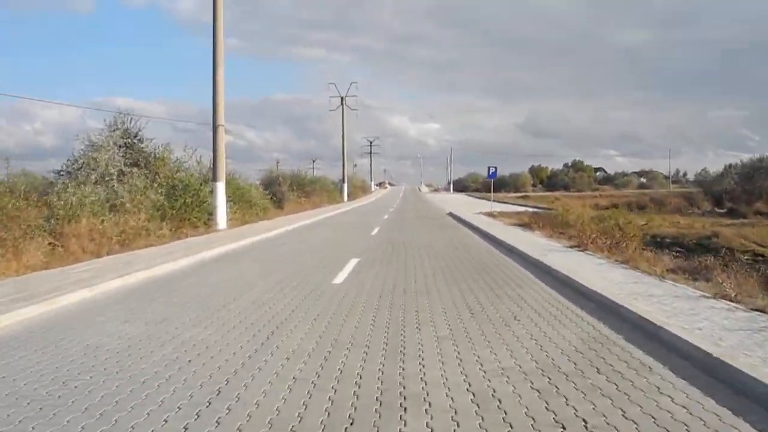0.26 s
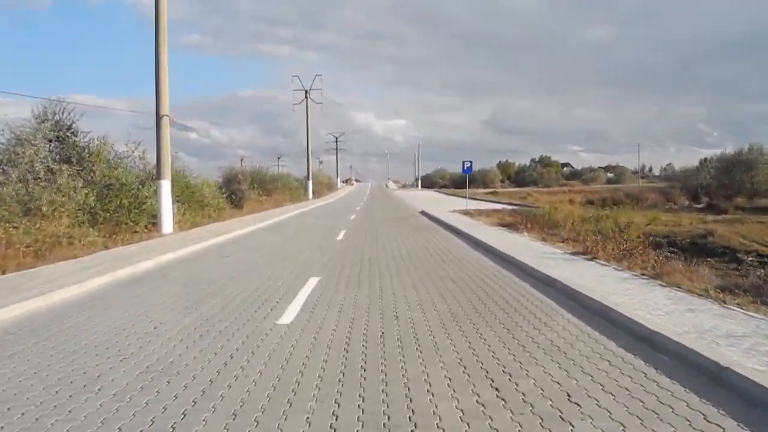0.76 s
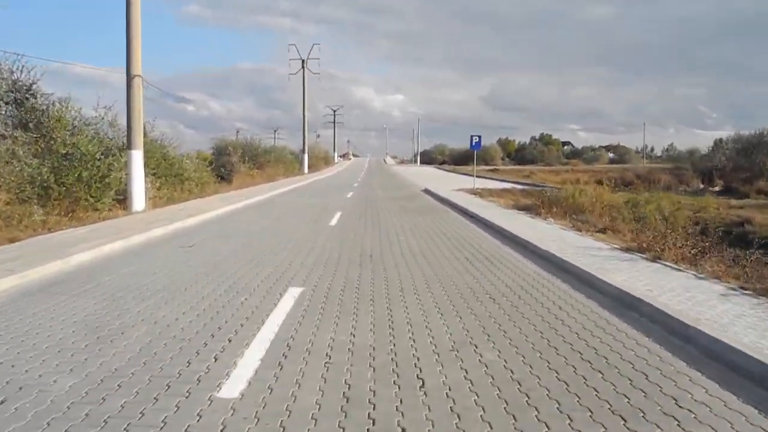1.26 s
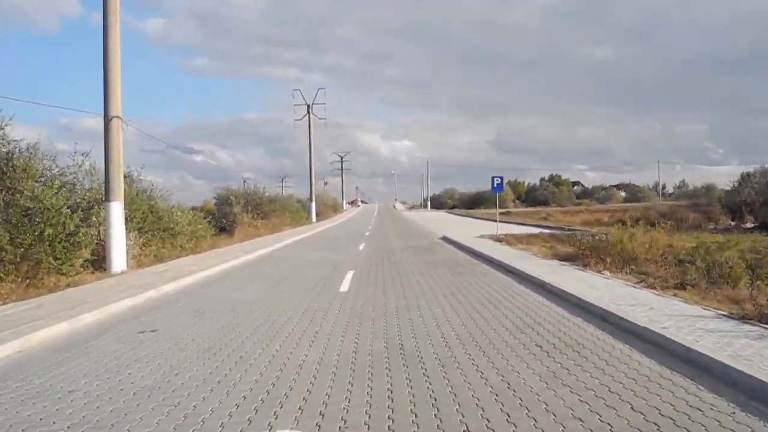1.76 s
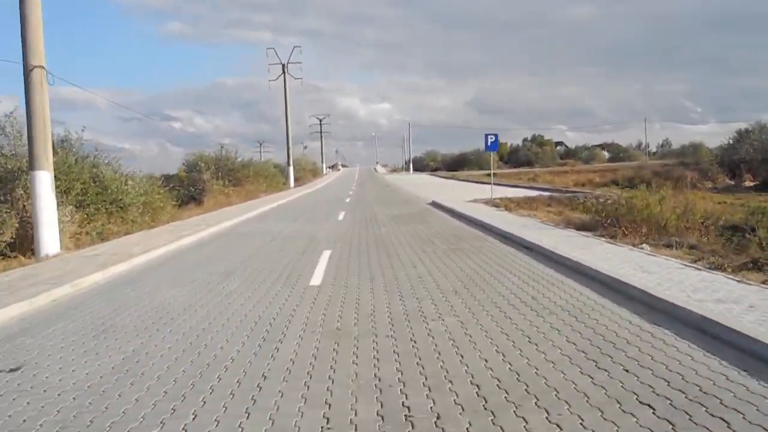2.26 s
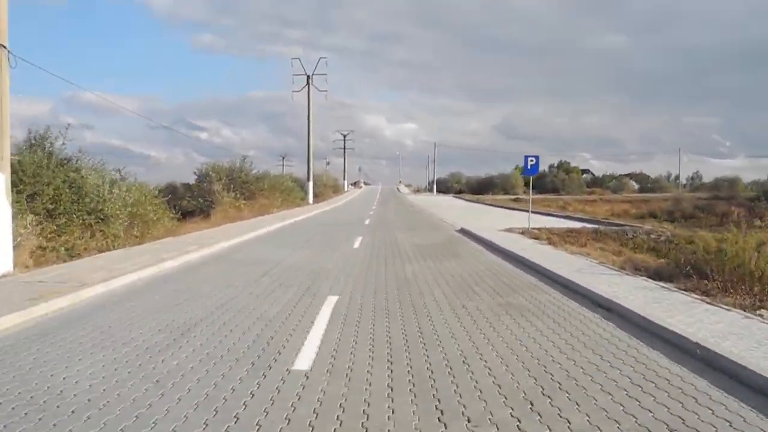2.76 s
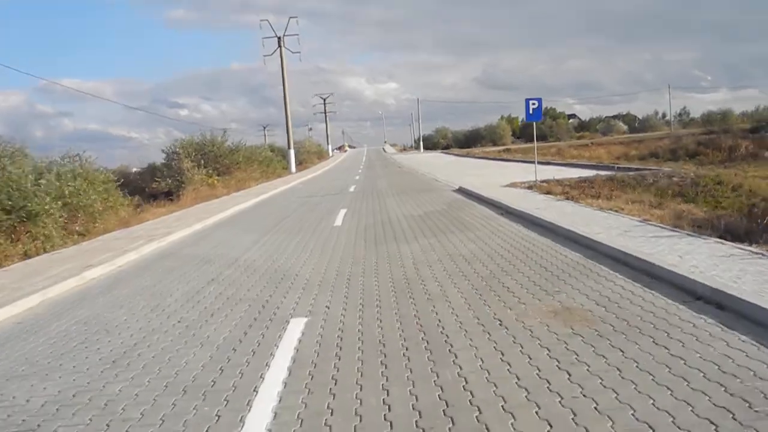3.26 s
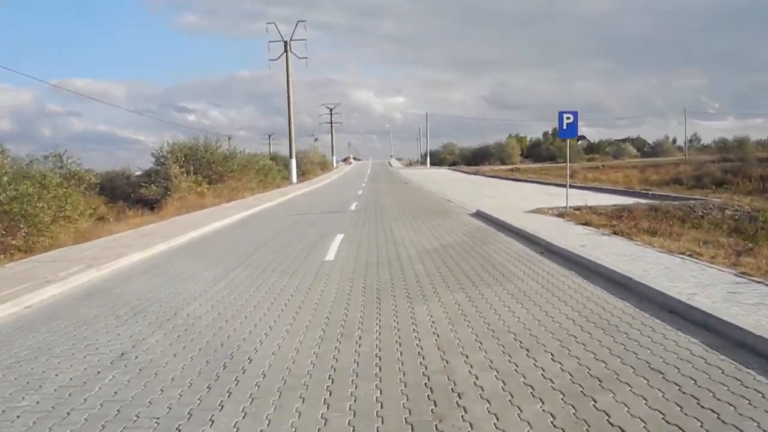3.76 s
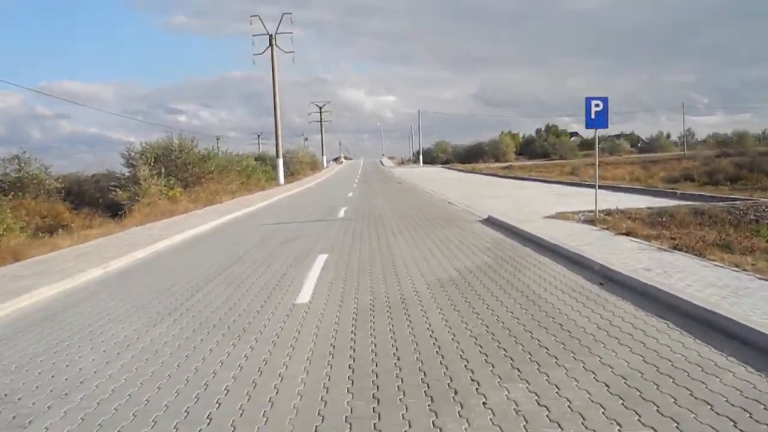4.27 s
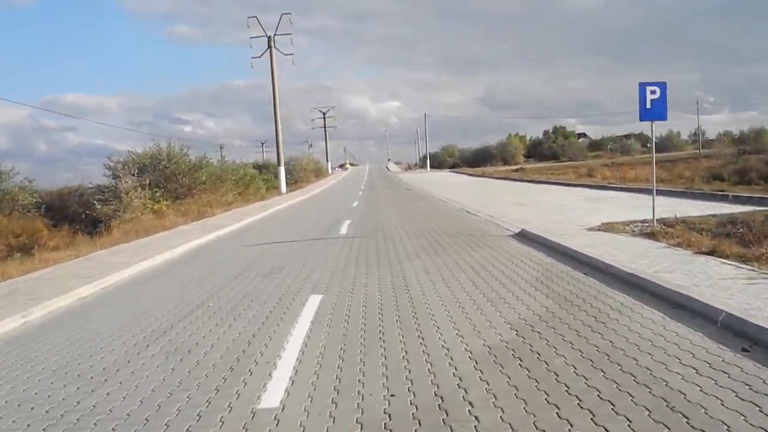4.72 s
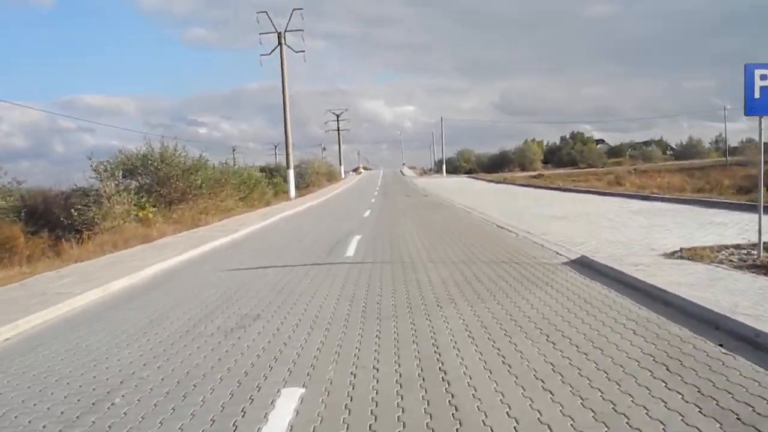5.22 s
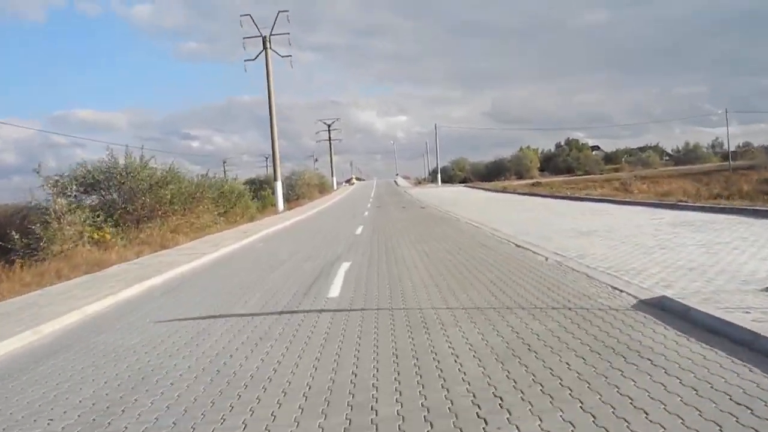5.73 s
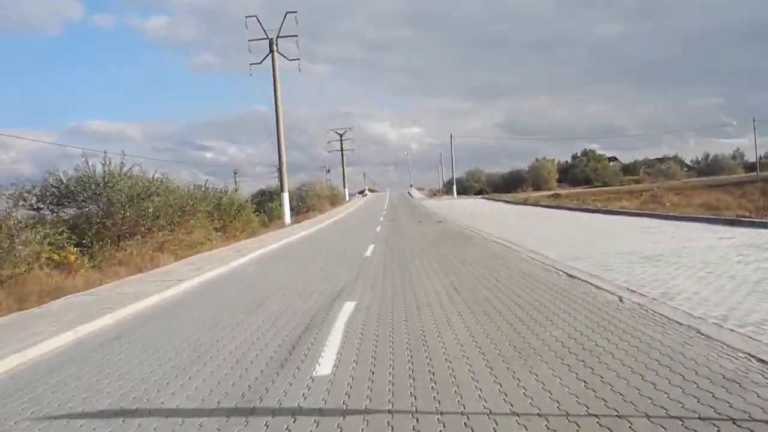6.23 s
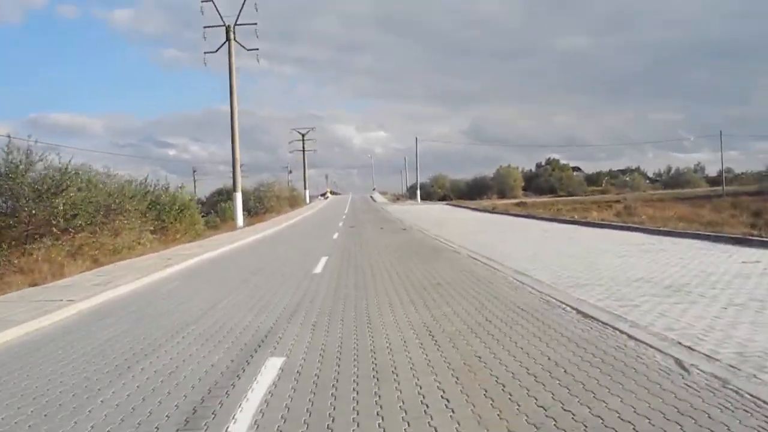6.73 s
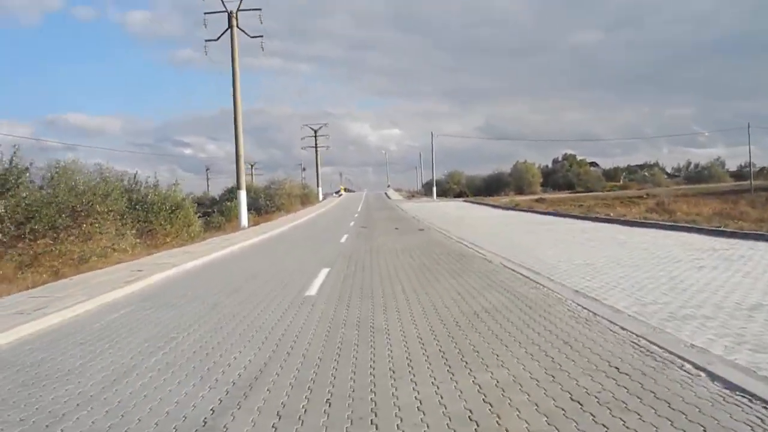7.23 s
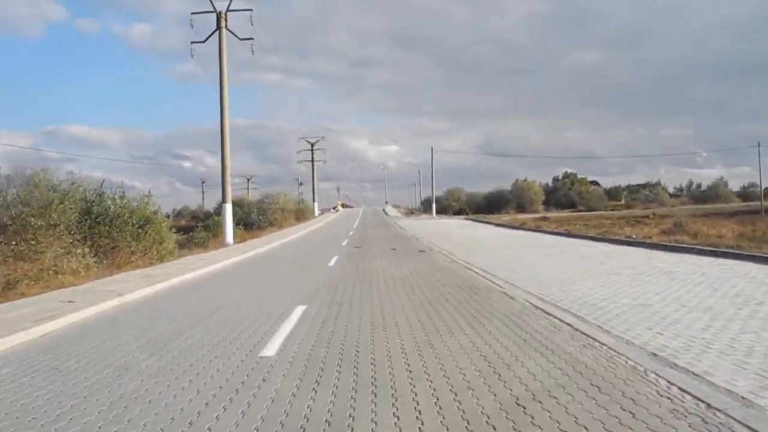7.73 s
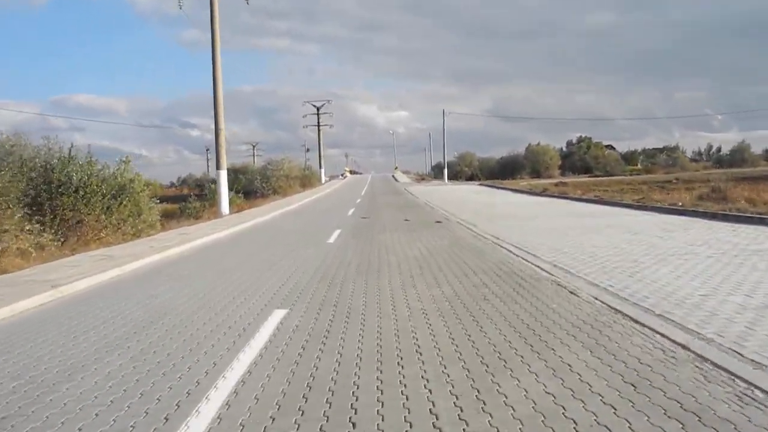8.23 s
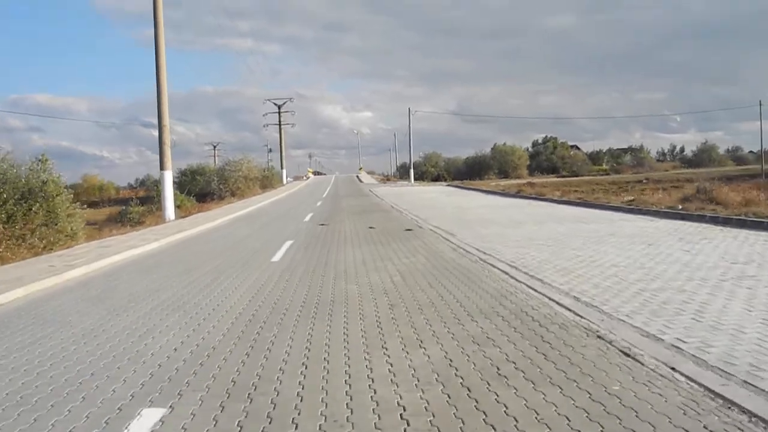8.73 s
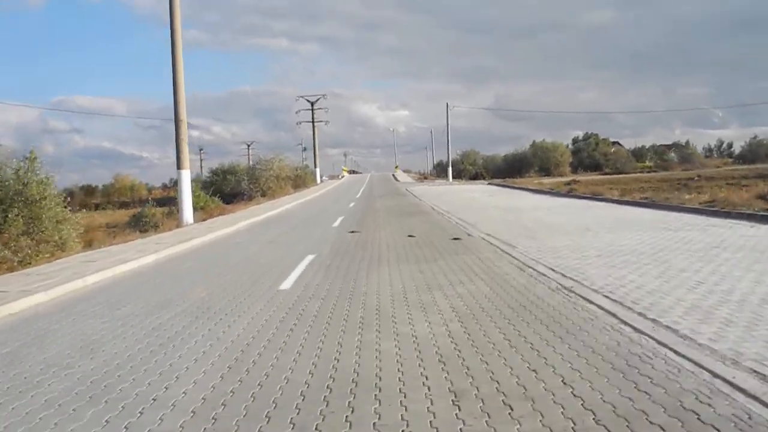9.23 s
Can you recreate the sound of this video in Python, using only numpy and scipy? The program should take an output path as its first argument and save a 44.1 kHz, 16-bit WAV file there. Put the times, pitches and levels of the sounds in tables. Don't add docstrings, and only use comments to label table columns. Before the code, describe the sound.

Headwind rumbles and drums against the microphone of a moving bicycle while tyres roar over paving joints and loose parts tick and rattle.

```python
import sys
import numpy as np
from scipy import signal
from scipy.fft import rfft, irfft, next_fast_len
from scipy.io import wavfile
from scipy.ndimage import uniform_filter1d

SR = 44100
rng = np.random.default_rng(int(sys.argv[2]) if len(sys.argv) > 2 else 0)


def natural_amplitude(level_db):
    exponent = np.asarray(level_db, float) / 20
    return 10 ** exponent


def unload_audio(sound):
    columns = np.transpose(np.atleast_2d(sound))
    steps = np.round(np.clip(columns, -1, 1) * 32767)
    wavfile.write(sys.argv[1], SR, steps.astype(np.int16))


N = 418509
STRIKE_S = np.arange(-900, 900) / SR


def unit(x):
    return x / np.sqrt(np.mean(x ** 2))


def colour(x, shape):
    size = next_fast_len(x.shape[-1])
    hz, db = np.transpose(shape)
    f = np.maximum(np.arange(size // 2 + 1) * SR / size, 1)
    gain = natural_amplitude(np.interp(np.log(f), np.log(hz), db, left=-99, right=-99))
    return unit(irfft(rfft(x, size) * gain, size)[..., :x.shape[-1]])


def walk(rate_hz):
    k = int(SR / rate_hz)
    steps = np.repeat(rng.standard_normal(N // k + 1), k)
    return unit(uniform_filter1d(uniform_filter1d(steps, k), k)[:N])


def curves(table):
    s, *columns = np.transpose(table)
    return [np.interp(np.arange(N) / SR, s, c) for c in columns]


def bumps(rows):
    s, height, half = np.transpose(rows)[:, :, None]
    t = np.arange(0, N + 256, 256) / SR
    change_db = (height * np.maximum(1 - abs(t - s) / abs(half), 0)).sum(axis=0)
    return np.interp(np.arange(N) / SR, t, change_db)


def patchy(shape, shared_db, own_db, rate_hz, count):
    size = next_fast_len(N)
    whole = rfft(colour(rng.standard_normal(size), shape))
    edges = np.log(np.array([shape[1][0], shape[-2][0]]) * size / SR)
    place = np.interp(np.log(np.arange(len(whole)) + 1), edges, [0, count - 1])
    total = 0
    for k in range(count):
        band = irfft(whole * np.maximum(1 - abs(place - k), 0), size)[:N]
        total = total + band * natural_amplitude(own_db * walk(rate_hz))
    return unit(natural_amplitude(shared_db) * total)


def add(track, s, grain):
    i = max(int(s * SR), 0)
    grain = grain[..., i - int(s * SR):]
    track[..., i:i + grain.shape[-1]] += grain[..., :N - i]


def burst(shape, length_s, lean=.65, edge=0.93):
    x = np.linspace(0, 1, int(np.clip(length_s, .004, .09) * SR))
    noise = colour(rng.standard_normal(4096), shape)[:len(x)]
    return unit(noise * abs(np.sin(np.pi * x ** lean)) ** edge)


def strike(db, pan_db, shape, fade_s, sharp=0):
    t = STRIKE_S
    source = rng.standard_normal((2, len(t)))
    source[1] = source[0] * natural_amplitude(-abs(pan_db)) + source[1] * np.sqrt(1 - natural_amplitude(-2 * abs(pan_db)))
    noise = colour(source, shape)
    crack = colour(1. * (t == 0), shape)
    click = (noise * (t > 0) + sharp * crack) * np.exp(-abs(t) / fade_s)
    click = click / abs(click).max(axis=1, keepdims=True)
    click = click + natural_amplitude(-26.0) * noise * np.hanning(len(t))
    return natural_amplitude(db + np.array([[pan_db], [-pan_db]]) / 2) * click


def flutter(hz):
    return [(290, -9), (.85 * hz + 40, -3), (hz + 45, 0), (1.3 * hz + 90, -9), (2.2 * hz, -19), (4 * hz, -35)]


# frequency in Hz, level in dB per Hz.
TYRE_ROAR = [(530, -4), (900, 2.5), (1080, -4), (1290, 4), (1450, -3), (1760, -3), (1980, -10),
             (3300, -22.5), (4290, -59), (7260, -120)]
# time in seconds, change in dB, half length in seconds.
ROAR_CHANGES = [
    (1.14, 2.5, 0.11),
    (2.7, -8, 0.035),
    (3.83, -2, 0.032),
    (5.0, 2, .07),
    (6.19, -5, 0.068),
    (6.61, 7, 0.11),
    (7.38, 6, 0.028),
    (7.66, 8, 0.044),
    (8.0, -4.5, 0.14),
]


def tyres(wind_db, eddy):
    roar = patchy(TYRE_ROAR, 0.88 * eddy + 2.1 * walk(90), own_db=1.5, rate_hz=18, count=5)
    return natural_amplitude(-54.5 + wind_db + bumps(ROAR_CHANGES)) * roar


# start in seconds, peak in dB, ring in Hz.
MORE_KNOCKS = [(0.7485, -46, 1700), (1.1224, -48, 1500), (1.714, -41, 1710), (2.291, -47, 1980),
               (3.7663, -37, 1680), (3.9138, -41, 1640), (5.151, -43.5, 1550), (5.307, -44, 1530),
               (5.546, -37, 1630), (6.047, -47, 1590), (6.1235, -51, 1500), (6.4676, -47, 1890),
               (6.582, -48, 1850), (6.661, -44, 2280), (6.695, -41, 1720), (6.7703, -37, 1740),
               (8.0387, -50.5, 1720), (8.85, -34, 1510), (9.237, -45, 1550), (9.339, -40, 1670)]


def more_knocks():
    out = np.zeros((2, N))
    for s, db, hz in MORE_KNOCKS:
        add(out, s, natural_amplitude(db - 8) * burst([(0.35 * hz, -15), (hz, 0), (1.4 * hz, -12)], 0.009))
    return out


# start in seconds, peak in dB, ring in Hz, length in seconds.
KNOCKS = [(1.257, -42, 1840, 0.015), (1.316, -39, 1560, 0.012), (2.207, -34.5, 1670, 0.0089),
          (2.635, -40, 1710, 0.014), (3.564, -44, 2350, 0.037), (5.515, -38, 1560, 0.0031),
          (5.82, -49, 1880, 0.012), (6.637, -48.5, 2120, 0.026), (7.284, -37, 1860, 0.0035),
          (7.59, -37, 1740, 0.0048), (7.838, -48, 1710, 0.01)]


def knocks():
    out = np.zeros((2, N))
    for s, db, hz, length_s in KNOCKS:
        add(out, s - .002, natural_amplitude(db - 5.5) * burst([(0.52 * hz, -15), (hz, 0), (1.36 * hz, -12)], length_s))
    return out


# frequency in Hz, level in dB per Hz.
TREBLE = [(1760, -23), (3000, 1), (3290, -2), (5630, -4.5), (6480, -3), (8640, -11.5), (12600, -10.5),
          (15100, -16), (16000, -9)]
# time in seconds, change in dB, half length in seconds.
HUSHES = [(.05, -4, 0.097), (.19, -7, 0.093), (.46, -5, 0.03), (.85, -5, .05), (2.02, -3, 0.056),
          (4.24, -9, .06), (4.34, -7.5, .05), (4.71, -8.5, 0.062), (4.82, 3.5, 0.064), (5.24, -3.5, 0.043),
          (5.89, 5, 0.072), (6.4, -3, .05), (6.89, -3.5, 0.056), (7.21, -5, 0.036), (2.4, -2, 0.045),
          (8.49, -2.5, 0.18), (8.73, -5, 0.042)]


def chatter(wind_db, bright_db, lean_db):
    bright_db = bright_db + bumps(HUSHES)
    left_db = -67.5 + 0.75 * wind_db + bright_db + lean_db / 2
    right_db = -71.5 + 0.95 * wind_db + bright_db - lean_db / 2
    out = []
    for db in (left_db, right_db):
        shake_db = 2.5 * walk(25)
        grit = 0
        for hz, spread in ((4450, 1.08), (6100, 1.2), (6500, 2.1)):
            chance = rng.random((2, N))
            hits = chance[0] < 55 / SR * natural_amplitude(.25 * (db + 66))
            clicks = hits * natural_amplitude(-2.3 * np.log(chance[1] + .12))
            tail = rng.standard_normal(N) * signal.lfilter([1], [1, -.93], clicks)
            ring = [(.45 * hz, -20), (hz / spread, -11), (hz, 0), (hz * spread, -12), (16000, -23)]
            grit = grit + colour(tail, ring)
        hiss = patchy(TREBLE, shake_db, own_db=.8, rate_hz=16, count=4)
        out.append((natural_amplitude(db) + natural_amplitude(-90.0)) * (natural_amplitude(-1.5) * hiss + natural_amplitude(-3.5) * unit(grit)))
    return np.array(out)


# frequency in Hz, level in dB per Hz.
CRACK = [(300, 24.5), (1500, -0.5), (3300, 0), (8000, -2), (16000, -11)]
# start in seconds, peak in dB, left minus right in dB, ring in Hz.
RATTLES = [(0.9226, -47, 3, 4830), (1.197, -52, -12, 4200), (1.256, -42, -7, 3820), (1.266, -49, -4, 3570),
           (1.3171, -32.5, -4.5, 6550), (1.3518, -51, -16, 6200), (1.5979, -41, 3, 4640),
           (1.61, -49, -14, 4600), (1.8353, -51, -12, 4350), (1.8453, -47, -4, 5730),
           (1.9365, -48.5, 1, 5600), (2.1466, -43.5, 3, 4570), (2.249, -47, -7, 3940),
           (2.6475, -39, -6, 5950), (2.7952, -45, -4.5, 5170), (2.8284, -48, -3, 6370),
           (3.0038, -52, 9, 4220), (3.0723, -48, 11, 5300), (3.1511, -52, 7, 6240), (3.157, -49, 18, 4260),
           (3.2371, -47, 14, 4350), (3.2784, -54.5, 17.5, 4400), (3.371, -52.5, 14, 4700),
           (3.3922, -48, -4, 5730), (3.7912, -45, -2, 4700), (4.0058, -47, 7, 4230),
           (4.1713, -54, 18, 4280), (4.561, -57, 17, 7840), (4.8963, -54, -14, 4190),
           (5.1643, -52, 23, 5300), (5.815, -41, 5, 4440), (5.8966, -50, 3, 4900), (6.4683, -44, 1, 4550),
           (6.5827, -44, 6, 4500), (6.6384, -48.5, -4, 4610), (6.6453, -52, 15, 6420),
           (6.7121, -45.5, 4, 5360), (6.7716, -50, -2, 6370), (6.8307, -47, -14, 4340),
           (6.9754, -54, -19, 6200), (7.3697, -53, -16, 6740), (7.944, -48, -2, 6200),
           (8.042, -46, -9, 4100), (8.1423, -48, 3, 6200), (8.1522, -51.5, -11, 5250),
           (9.1683, -46, -1, 5250), (9.217, -48, 6, 8790)]


def rattles():
    out = np.zeros((2, N))
    for s, db, pan_db, hz in RATTLES:
        shape = [(0.85 * hz, -20), (hz, 0), (1.2 * hz, -20)]
        ring = strike(db - 2 - 0.25 * abs(pan_db), pan_db, shape, 0.0013)
        crack = strike(db + 1 + 0.18 * abs(pan_db), pan_db, CRACK[1:], 0.00028)
        add(out, s + STRIKE_S[0], ring + crack)
    return out


# start in seconds, peak in dB, left minus right in dB.
HAIRS = [(0.1496, -50, 19), (0.4456, -52, 20), (1.122, -47, -3), (1.4301, -54, -2.0), (6.7564, -41, -1.0),
         (8.7789, -58, 2), (8.9376, -63, 1.0), (9.109, -45, 7), (0.7922, -46, 2), (0.9618, -52, -1),
         (1.0576, -50, 3), (2.5612, -40, -2), (2.6091, -50, 1), (2.7213, -45, 0), (6.089, -52, -2),
         (9.144, -47, 6), (9.456, -49, 14)]


def hairs():
    out = np.zeros((2, N))
    for s, db, pan_db in HAIRS:
        add(out, s + STRIKE_S[0], strike(db + 0.5, pan_db, CRACK[1:], 0.0003, sharp=.15))
    return out


# start in seconds, peak in dB, ring in Hz.
JINGLES = [(2.673, -45, 5900), (2.639, -42, 6450), (3.2156, -49, 4580), (3.247, -54, 4380),
           (3.2674, -49, 4680), (3.4443, -46, 4500), (3.578, -47, 4430), (3.6885, -46, 4500),
           (3.7944, -51, 4700), (8.4233, -50.5, 6060), (8.6705, -42.5, 5500), (8.8333, -47, 5700),
           (8.88, -48, 5160), (9.0448, -39.5, 4250), (9.176, -43, 6100), (9.2668, -51, 6030)]


def jingles():
    out = np.zeros((2, N))
    for s, db, hz in JINGLES:
        shape = [(0.7 * hz, -25), (hz, 0), (1.16 * hz, -13), (1.8 * hz, -22)]
        add(out, s + STRIKE_S[0], strike(db - 0.5, 0, shape, 0.0036))
    return out


# start in seconds, peak in dB, left minus right in dB.
SNAPS = [(1.585, -33, -11.5), (3.446, -36.5, 5.5), (4.0165, -41, 9), (5.65, -44.5, -11), (5.8228, -43, 4),
         (7.2783, -39, 6), (8.343, -51, -13), (1.354, -52, -8), (1.802, -50, -20), (5.942, -45, -4),
         (6.369, -51, -17), (6.9059, -59, -16), (7.0785, -54.5, -19)]


def snaps():
    out = np.zeros((2, N))
    for s, db, pan_db in SNAPS:
        add(out, s + STRIKE_S[0], strike(db + 10.5, pan_db, CRACK, 0.0001))
    return out


# start in seconds, peak in dB, left minus right in dB, ring in Hz.
TICKS = [(0.062, -47, 22, 4440), (0.2814, -47.5, -22, 4320), (0.5117, -47.5, 9, 4160),
         (0.717, -39.5, 4, 6270), (1.2034, -45, 1, 5760), (1.311, -34, 9, 5370), (1.329, -36, -23, 4600),
         (1.3897, -43, 1, 4460), (1.4553, -40.5, -2, 6280), (1.679, -40.5, 4, 6060),
         (1.7244, -44, -11, 4100), (2.072, -40, 0, 6100), (2.6745, -33, 1, 4150), (2.772, -37, 0, 5770),
         (3.0522, -36.5, -5, 5560), (3.3978, -39.5, -1, 6110), (3.763, -34, 6, 4370), (4.025, -42, 3, 6300),
         (4.207, -46, 24, 4220), (5.562, -45, -26, 4970), (6.344, -54, -27, 4420), (6.66, -37, -7, 4230),
         (6.745, -42, -18, 5600), (6.8, -49, -12, 4300), (7.408, -48, -27.5, 4350),
         (7.589, -34, -3.5, 3530), (8.0153, -38.5, -1.5, 6000), (8.124, -34, 0, 4200),
         (8.212, -44.5, -3, 4180), (8.7205, -42, 14, 4560)]


def ticks():
    out = np.zeros((2, N))
    for s, db, pan_db, hz in TICKS:
        ring = strike(db - 5.0, pan_db, [(0.9 * hz, -20), (hz, 0), (1.1 * hz, -20)], 0.00096)
        add(out, s + STRIKE_S[0], ring + strike(db - 2.5, pan_db, TREBLE, 0.001))
    return out


# start in seconds, peak in dB.
LEFT_CRACKS = [(0.0057, -39.5), (0.26, -45), (0.33, -40), (1.9747, -42.5), (1.9975, -42), (3.203, -47),
               (3.247, -40), (3.3466, -38.5), (3.6005, -32.5), (3.7994, -39), (3.9252, -36), (4.0618, -42),
               (4.095, -43), (4.186, -39), (4.4011, -36), (4.4233, -46), (4.4667, -35), (4.601, -39),
               (5.0844, -40), (5.174, -34), (5.2115, -43.5), (6.069, -44), (7.0284, -41), (9.3706, -37.5),
               (9.4118, -39), (9.4284, -38)]
# start in seconds, peak in dB.
RIGHT_CRACKS = [(0.7238, -35), (0.8945, -46), (0.978, -38), (1.138, -46), (1.256, -55), (1.8303, -36),
                (2.2513, -33.5), (2.2703, -41), (2.295, -35), (2.378, -41), (2.813, -36.5), (4.86, -40.5),
                (4.888, -34), (4.9328, -36), (5.51, -40), (6.1253, -33), (6.1593, -32.5), (6.1815, -40),
                (6.3232, -39.5), (6.477, -39), (6.5642, -36), (6.833, -51), (6.9623, -41), (7.0068, -39.5),
                (7.6814, -33), (7.8336, -32.5), (7.853, -37), (8.17, -40), (8.3033, -43.5), (8.395, -41.5)]


def port_cracks():
    out, t = np.zeros((2, N)), STRIKE_S
    shadow_db, shove_db = 20, 14.5
    shove = np.exp(-(t / .0012) ** 2) - .4 * np.exp(-((t - .003) / .003) ** 2)
    for cracks, pan_db in ((LEFT_CRACKS, shadow_db), (RIGHT_CRACKS, -shadow_db)):
        for s, db in cracks:
            crack = strike(db + 10.0 - shadow_db / 2, pan_db, CRACK, 0.0007, sharp=.8)
            add(out, s + t[0], crack + natural_amplitude(db + shove_db) * shove)
    return out


# start in seconds, peak in dB.
PUFFS = [
    (0.137, -29.5),
    (1.493, -24),
    (2.109, -23),
    (2.493, -25),
    (3.835, -26),
    (5.004, -26.5),
    (5.284, -29),
    (6.157, -23.5),
    (6.008, -29),
]


def puffs():
    out = np.zeros((2, N))
    for s, db in PUFFS:
        add(out, s, natural_amplitude(db - 10.0) * burst(flutter(380), 0.012, lean=.5))
    return out


# frequency in Hz, level in dB per Hz.
RUMBLE = [(8.8, -23), (15, -13), (92, 1.5), (138, 0), (242, -11), (282, -12.5), (300, -14), (390, -57),
          (660, -120)]
# start in seconds, peak in dB, centre in Hz, length in seconds.
GUSTS = [(0.313, -22.5, 386, 0.013), (0.659, -19, 344, 0.056), (1.794, -24.5, 330, 0.031),
         (1.969, -25.5, 346, 0.048), (2.066, -18.5, 354, 0.023), (2.181, -22, 370, 0.069),
         (2.352, -23, 330, 0.035), (2.76, -26, 400, 0.031), (2.936, -22, 310, 0.054),
         (4.789, -18.5, 347, 0.058), (5.053, -26, 348, 0.026), (5.147, -24.5, 360, 0.024),
         (5.298, -17.5, 388, 0.04), (5.549, -23.5, 360, 0.018), (5.718, -20.5, 338, 0.014),
         (5.805, -17.5, 330, 0.032), (5.861, -25, 350, 0.029), (6.103, -22, 373, 0.049),
         (6.225, -21, 351, 0.063), (6.681, -24.5, 356, 0.013), (6.863, -24.5, 308, 0.018),
         (7.329, -22, 340, 0.048), (7.365, -18, 383, 0.013), (7.579, -20.5, 356, 0.023),
         (7.805, -22.5, 348, 0.054), (7.928, -21, 380, 0.047), (8.035, -20, 337, 0.026),
         (8.302, -25.5, 304, 0.058), (8.704, -15, 304, 0.03)]


def gusts():
    out = np.zeros(N)
    for s, db, hz, length_s in GUSTS:
        add(out, s - .003, natural_amplitude(db - 8.0) * burst(flutter(hz), length_s, lean=.75, edge=.65))
        add(out, s - .003, natural_amplitude(db - 17.0) * burst(RUMBLE, length_s + 0.014))
    return out


# frequency in Hz, level in dB per Hz.
BUFFET = [(170, -34), (285, -20), (323, 3.5), (386, -2.5), (633, -12.5), (794, -11), (891, -21.5),
          (1000, -20.5), (1300, -35), (2200, -120)]
# time in seconds, change in dB, half length in seconds.
EDDIES = [(0.47, 7.5, 0.12), (0.55, -18, 0.061), (0.97, 8, 0.12), (1.6, 3.5, 0.058), (2.05, 7, 0.24),
          (2.14, -14, 0.041), (2.21, 1.5, 0.066), (2.36, 8.5, 0.047), (2.44, -13.5, 0.11), (2.63, 8, 0.082),
          (3.6, -6, 0.6), (4.82, -1, 0.096), (5.33, -7, 0.085), (5.54, 4.5, 0.18), (5.83, 11, 0.078),
          (6.2, -5, 0.031), (6.26, 5.5, 0.056), (6.4, -14.5, 0.046), (6.5, 6, 0.051), (6.69, -15, 0.055),
          (6.85, 3.5, 0.39), (7.5, -14.5, 0.085), (7.58, 7, 0.047), (7.86, -9, 0.19), (8.0, 5, 0.45),
          (8.56, -7.5, 0.22), (8.96, 2.5, 0.26), (9.33, -4, 0.17), (.2, -11, 0.037), (1.15, 3.5, 0.074),
          (1.85, 4.5, 0.057), (3.06, 0, 0.076), (4.83, -8, 0.068), (5.44, 1.5, 0.031), (6.0, 5.5, 0.11),
          (7.04, 4.5, 0.14), (8.27, -5, 0.039), (8.33, -8, 0.13)]
# time in seconds, change in dB, half length in seconds.
FLURRIES = [(.8, -4, 0.056), (1.21, -6.5, 0.034), (1.5, 2, 0.03), (2.485, -4, 0.022), (3.78, 7.5, 0.031),
            (3.88, 7.5, 0.05), (4.25, -3, 0.088), (5.68, 4.5, 0.053), (6.33, 4.5, 0.064), (6.49, -6, 0.15),
            (5.88, 4, 0.078), (3.05, -2.5, 0.053)]


def wind(wind_db, bright_db):
    rumble_db = -33 + bumps(EDDIES)
    buffet_db = -42.5 + bumps(FLURRIES) + 0.8 * wind_db - 0.71 * bright_db
    eddy, flap, chance = walk(14), walk(45), rng.random((2, N))
    pops = (chance[0] < 40 / SR) * natural_amplitude(5.0 * chance[1])
    rumble = patchy(RUMBLE, 3.36 * eddy + 2.0 * flap, own_db=2.1, rate_hz=8.3, count=3)
    rumble = rumble + natural_amplitude(-6.5) * colour(pops, RUMBLE)
    buffet = patchy(BUFFET, 0.34 * eddy + 2.26 * flap, own_db=1.5, rate_hz=30, count=3)
    buffet = buffet + natural_amplitude(-10.5) * colour(pops, BUFFET)
    return natural_amplitude(rumble_db - 1.5) * rumble + natural_amplitude(buffet_db - 0.5) * buffet, eddy + 0.81 * flap


# time in seconds, strength in dB, lean to the left port in dB.
HEADWIND = [(0.0, -7, 10), (0.54, -4, 1), (0.97, 5, -3), (1.9, 4, -2), (2.41, -1, -1), (2.8, 3, -5),
            (3.3, 2, 1.5), (3.9, -2, 1), (4.25, -2.5, -1), (4.9, -2, 0), (5.7, 4, -2.5), (6.4, -5.5, 0.5),
            (6.9, 0, -8), (7.45, -3.5, 0), (8.45, -1, -5.5), (8.95, 8, -1), (9.34, 10, 0), (9.49, -9, 10)]
# time in seconds, rise in dB, half length in seconds, extra brightness in dB.
SWELLS = [(0.334, 6.5, 0.28, -2), (0.673, 6.5, 0.094, -2.5), (1.298, 10.5, 0.086, 1.5),
          (1.596, 7.5, 0.16, -3.5), (2.09, 3.5, 0.24, -3.5), (2.225, 7, 0.19, 6.5), (2.634, 13, 0.22, 2),
          (2.956, 0, 0.03, 12.5), (3.048, 9.5, 0.18, -2), (3.56, 8.5, 0.16, 4), (3.799, 12, 0.15, 2),
          (4.036, 5, 0.088, -0.5), (4.156, 1.5, 0.022, -6), (4.385, 5, 0.052, -0.5),
          (4.81, 4.5, 0.11, -6.5), (5.092, 5.5, 0.12, -1), (5.333, 0, 0.047, -7), (5.522, 4, 0.15, -3),
          (5.855, 3, 0.13, -5.5), (6.082, 8.5, 0.23, -2), (6.3, 8.5, 0.03, -3), (6.502, 9, 0.083, -1.5),
          (6.744, 8.5, 0.11, 2.5), (7.326, 2.5, 0.1, -3.5), (7.606, 5.5, 0.14, 0), (7.825, 9.5, 0.062, 0.5),
          (7.977, 8.5, 0.1, -4), (8.087, 6.5, 0.11, -2.5), (8.683, 10.5, 0.15, -2),
          (8.833, 11.5, 0.056, -0.5)]


def scene():
    steady_db, lean_db = curves(HEADWIND)
    swells = np.array(SWELLS)
    wind_db = steady_db + bumps(swells[:, :3])
    bright_db = bumps(swells[:, [0, 3, 2]])
    blow, eddy = wind(wind_db, bright_db)
    centre = blow + gusts() + tyres(wind_db, eddy)
    road = more_knocks() + knocks()
    parts = rattles() + hairs() + jingles() + snaps() + ticks()
    return centre + chatter(wind_db, bright_db, lean_db) + road + parts + port_cracks() + puffs()


# frequency in Hz, level in dB per bin.
GATE_DB = [(3000, -97), (8000, -100), (16000, -101)]


def gate(x):
    hz, _, z = signal.stft(x, SR, nperseg=2048, window="cosine")
    power = (abs(z[:, :1024]) ** 2).reshape(2, 64, 16, -1).mean(axis=2)
    power = (power * natural_amplitude(4.5 * rng.standard_normal(power.shape))).repeat(16, axis=1)
    limit = natural_amplitude(np.interp(hz[:1024], *np.transpose(GATE_DB), left=-200))[:, None]
    z[:, :1024] *= power > limit ** 2
    z[:, hz > 15950] = 0
    return signal.istft(z, SR, nperseg=2048, window="cosine")[1][:, :N]


def band_limit(x):
    return signal.sosfilt(signal.butter(12, 16470, fs=SR, output="sos"), x)


# start in seconds, level in dB.
SLIPS = [
    (3.012, -45),
    (3.672, -51),
    (8.522, -52),
]
# frequency in Hz, level in dB per Hz.
SLIP = [(30, -22), (140, 2), (250, -12), (700, -30), (3000, -38)]


def record(dry):
    mid, side = (dry[0] + dry[1]) / 2, (dry[0] - dry[1]) / 2
    size = next_fast_len(N)
    hz = np.arange(size // 2 + 1) * SR / size
    side = irfft(rfft(side, size) * np.where(hz > 3090, 1, natural_amplitude(-31.0)), size)[:N]
    for s, db in SLIPS:
        add(side, s, natural_amplitude(db) * burst(SLIP, 0.047))
    return band_limit(gate(np.array([mid + side, mid - side])))


dry = scene()
out = record(dry)
unload_audio(out)
```